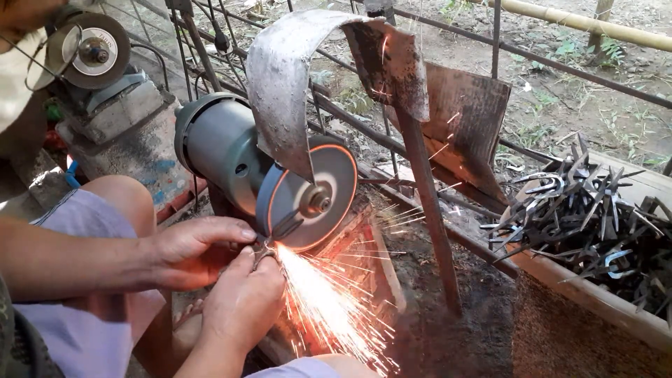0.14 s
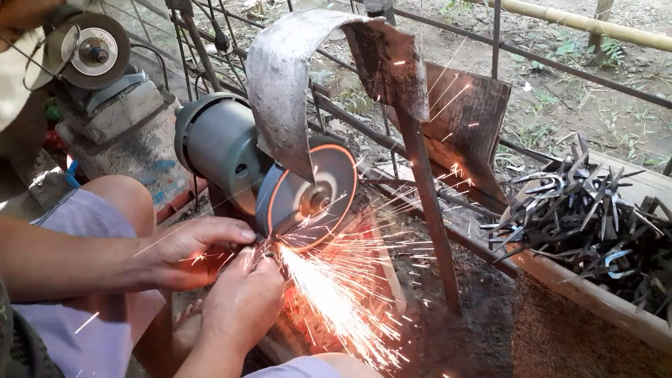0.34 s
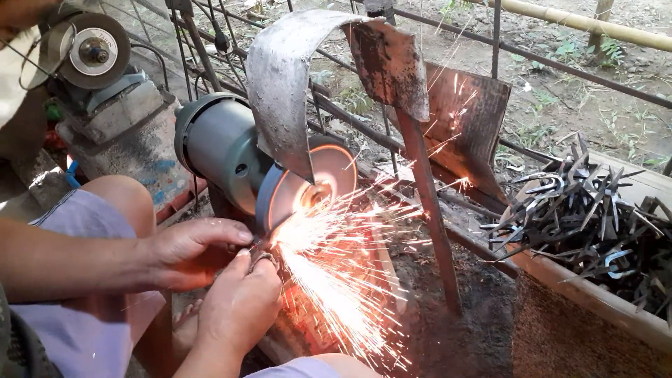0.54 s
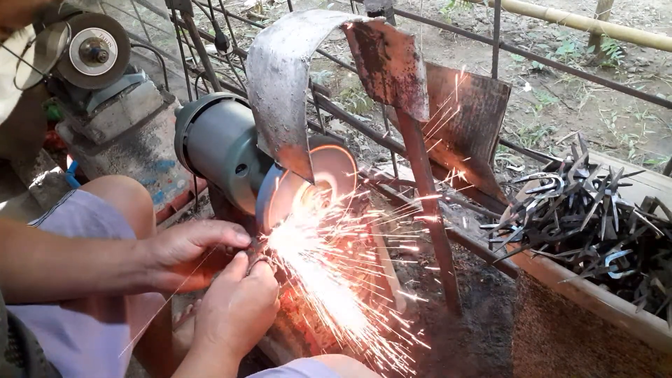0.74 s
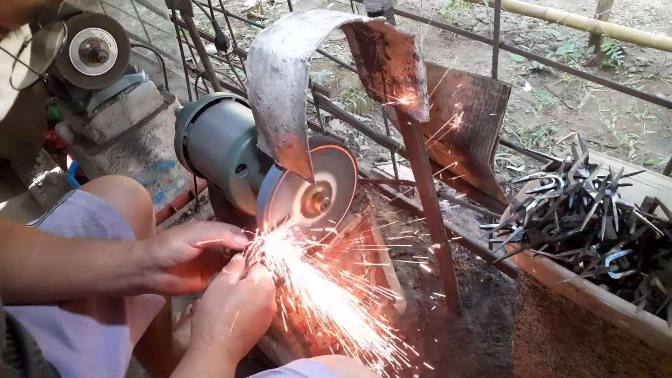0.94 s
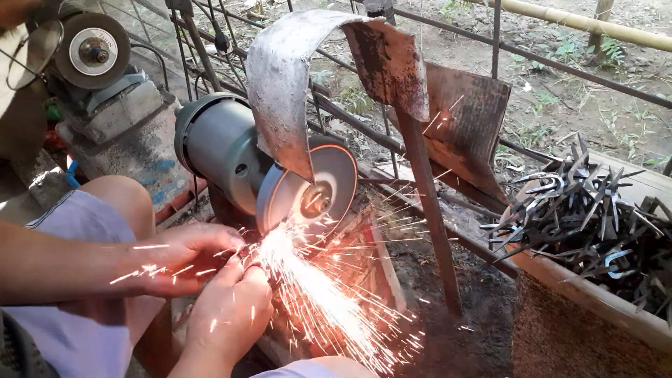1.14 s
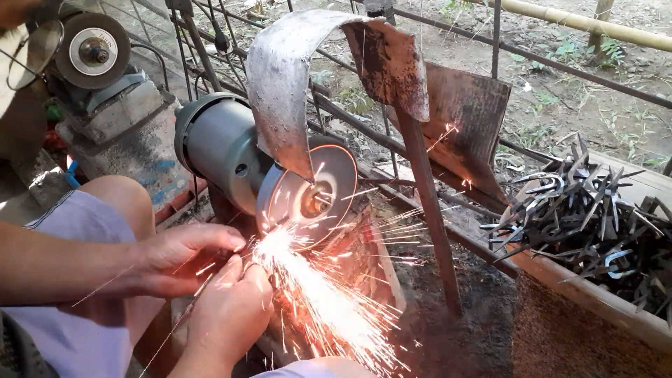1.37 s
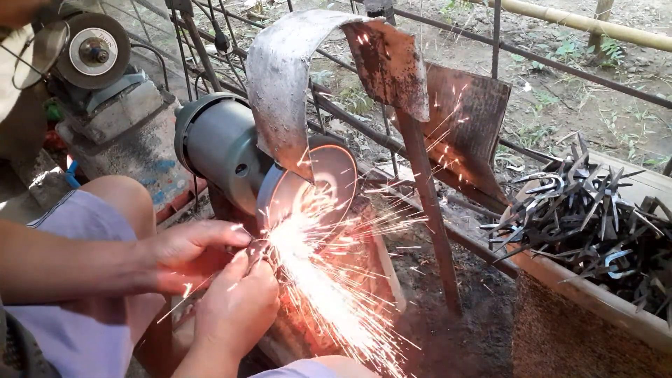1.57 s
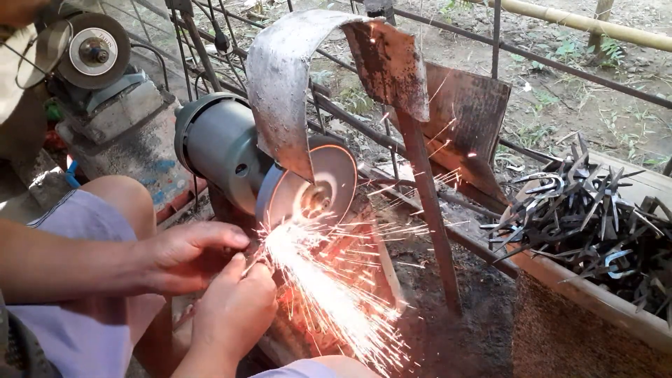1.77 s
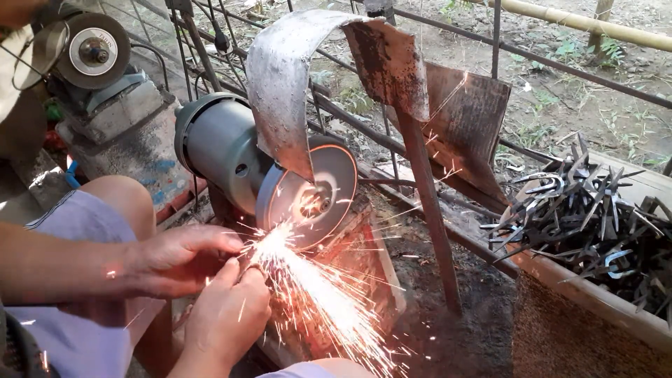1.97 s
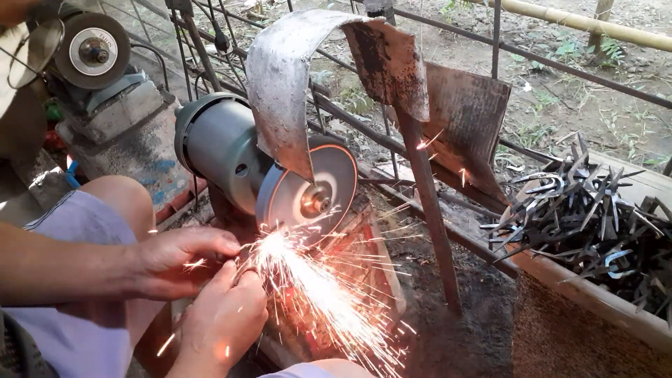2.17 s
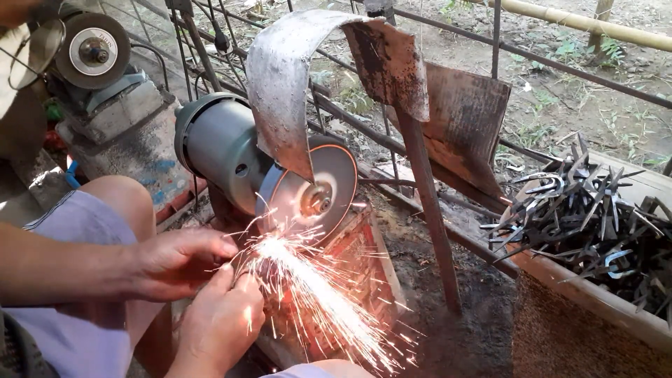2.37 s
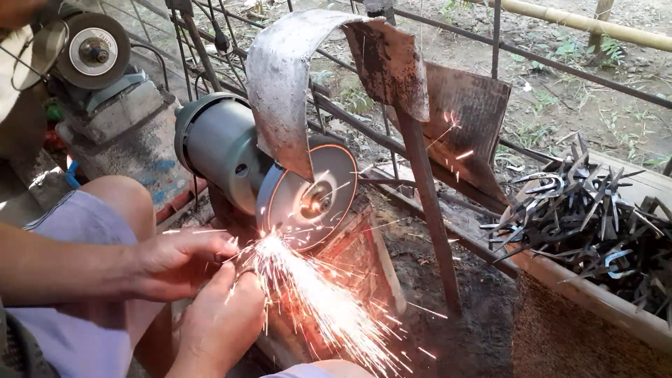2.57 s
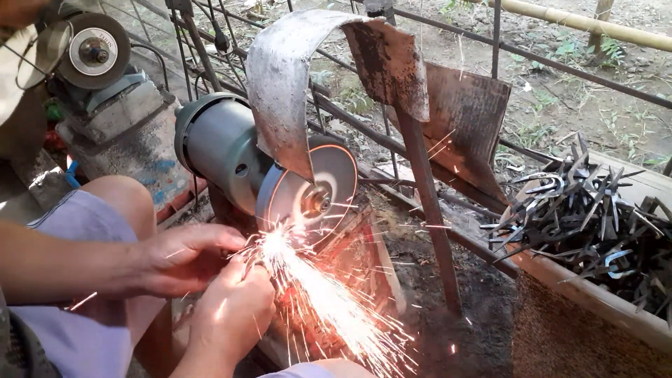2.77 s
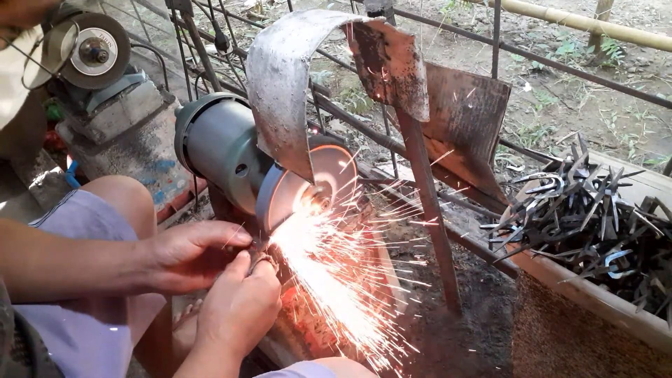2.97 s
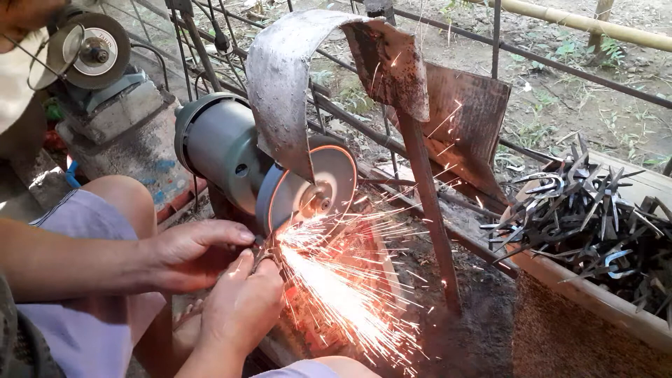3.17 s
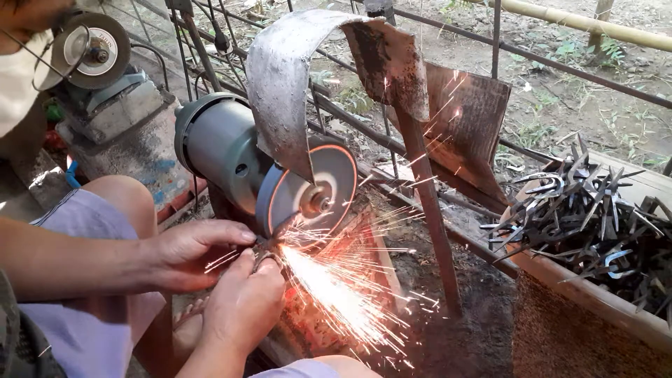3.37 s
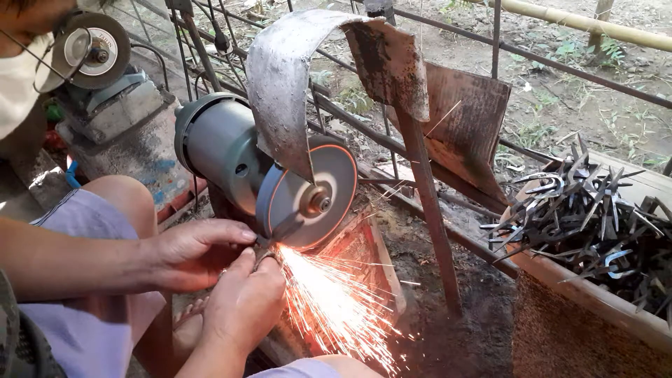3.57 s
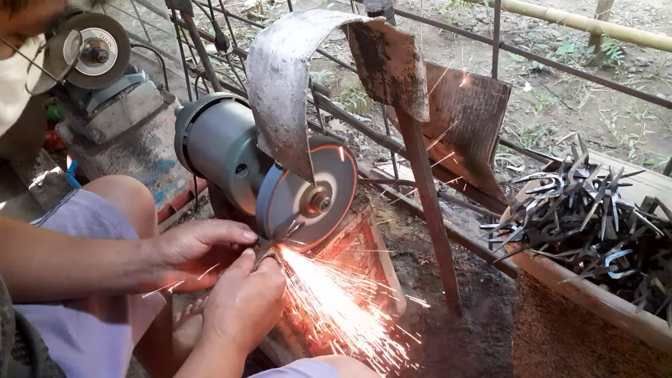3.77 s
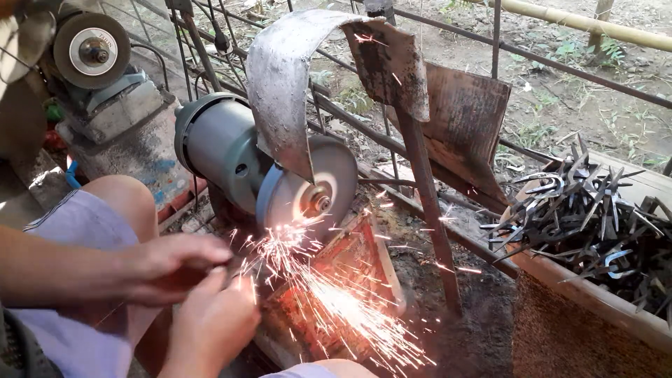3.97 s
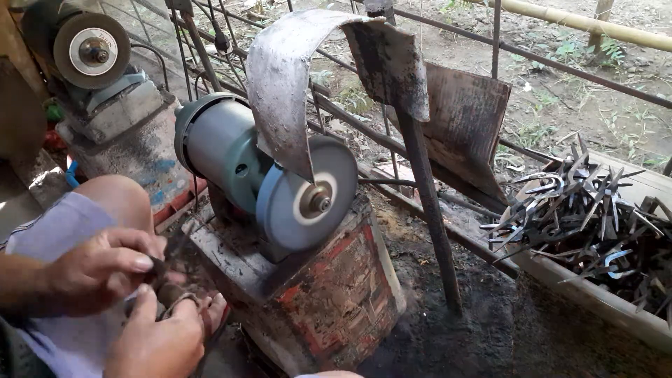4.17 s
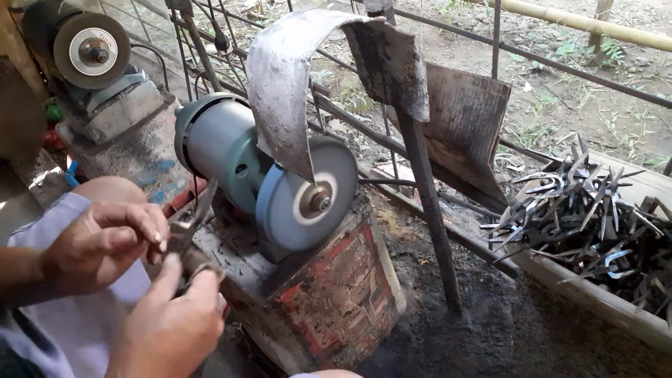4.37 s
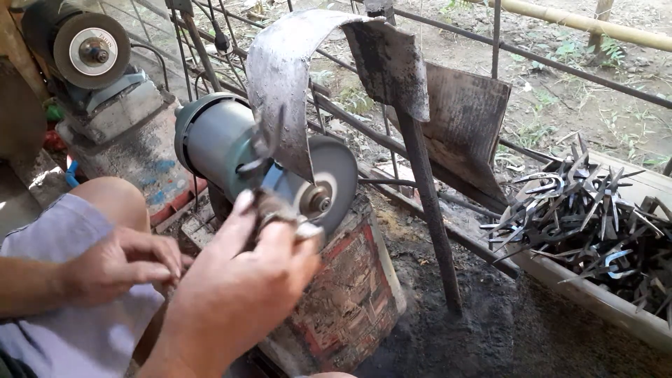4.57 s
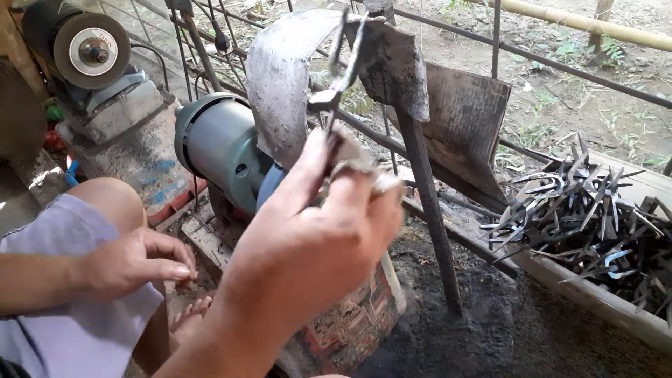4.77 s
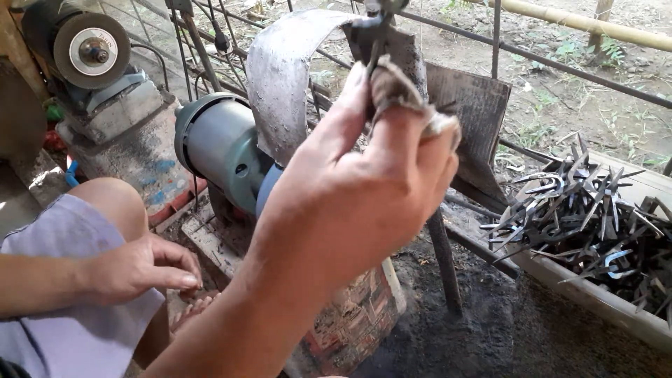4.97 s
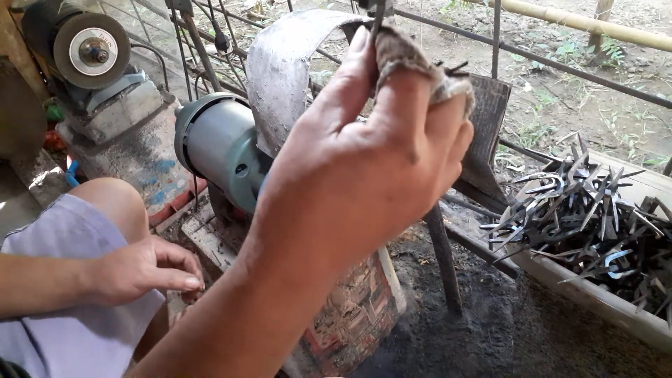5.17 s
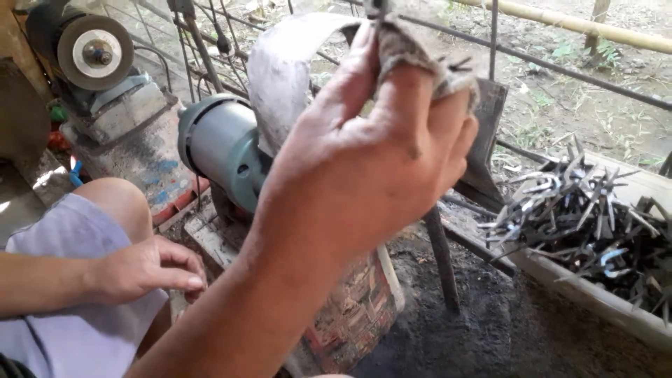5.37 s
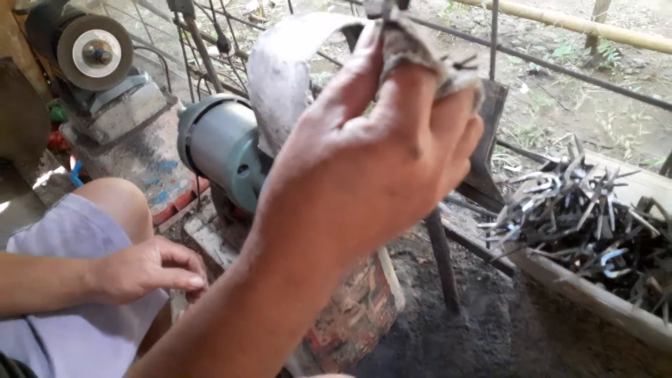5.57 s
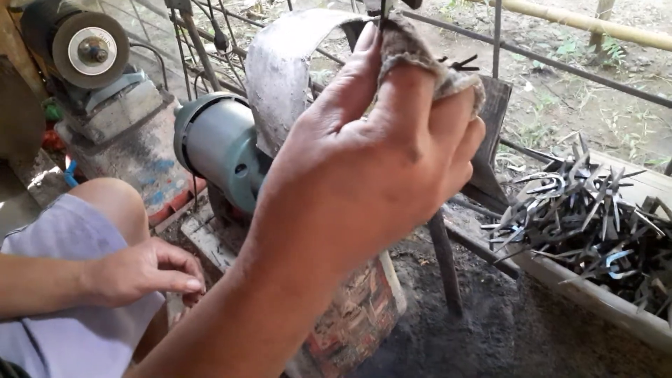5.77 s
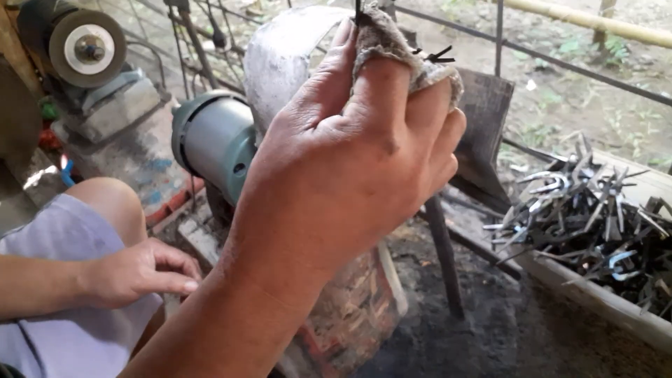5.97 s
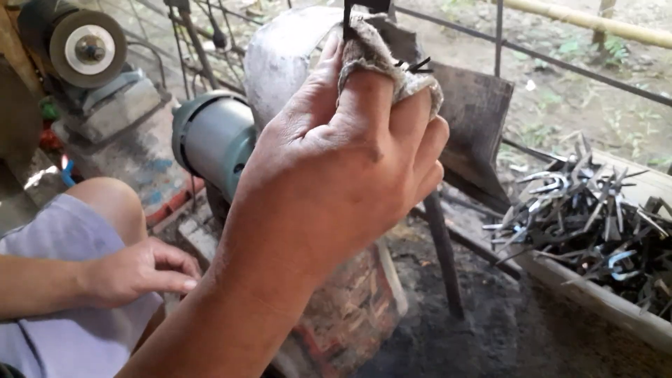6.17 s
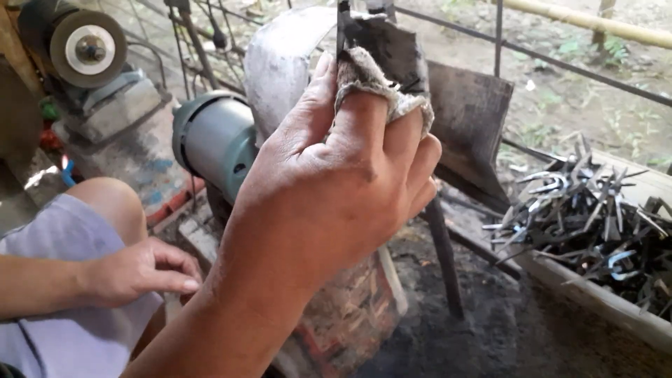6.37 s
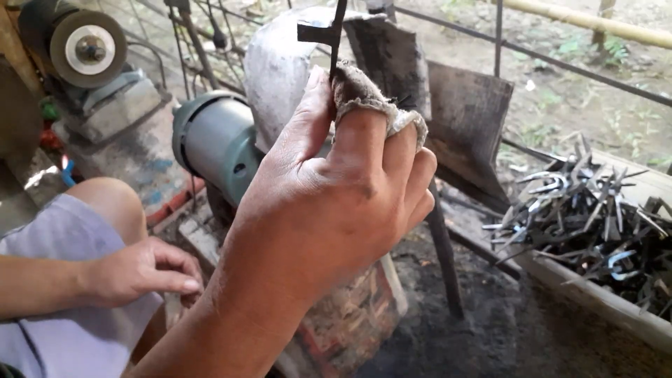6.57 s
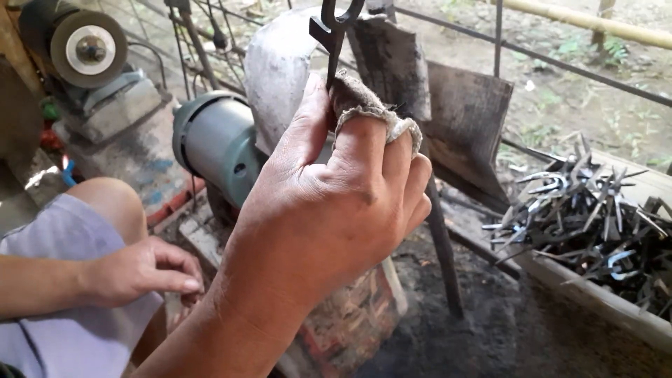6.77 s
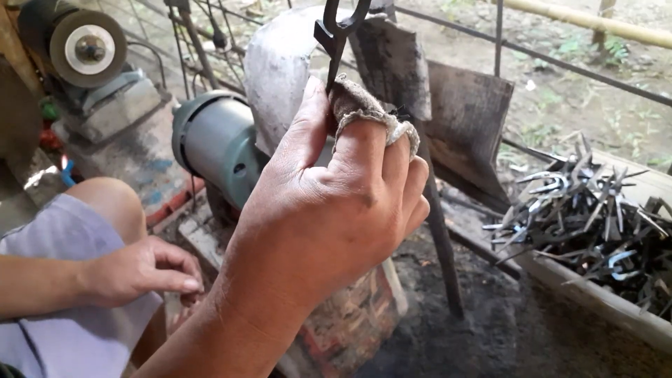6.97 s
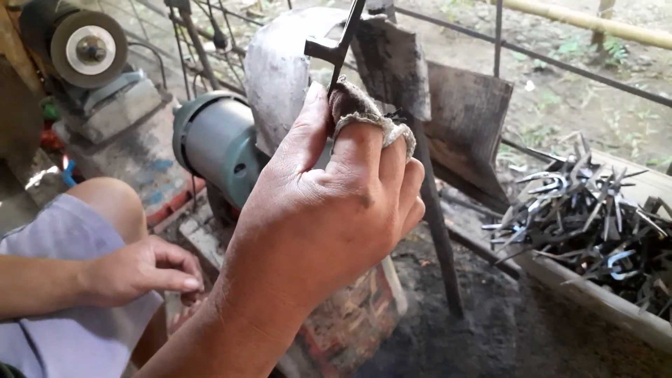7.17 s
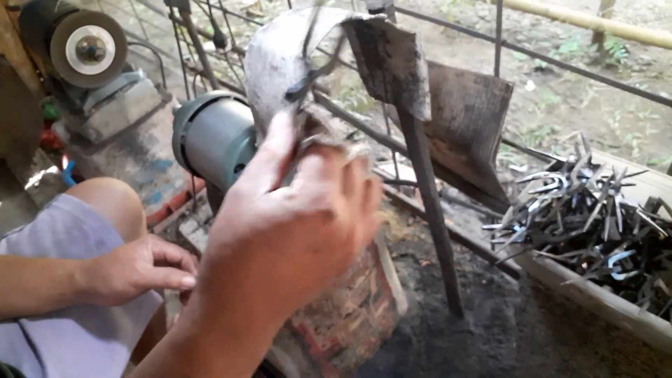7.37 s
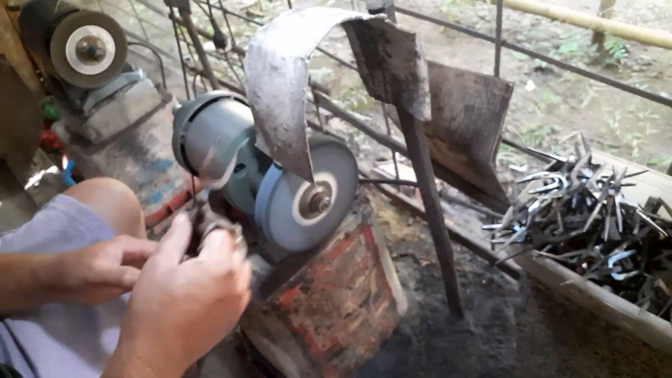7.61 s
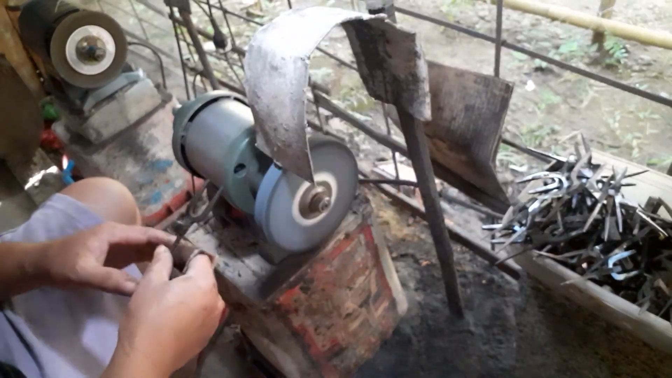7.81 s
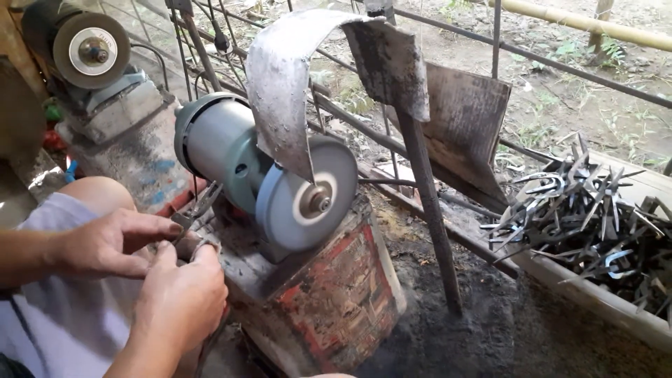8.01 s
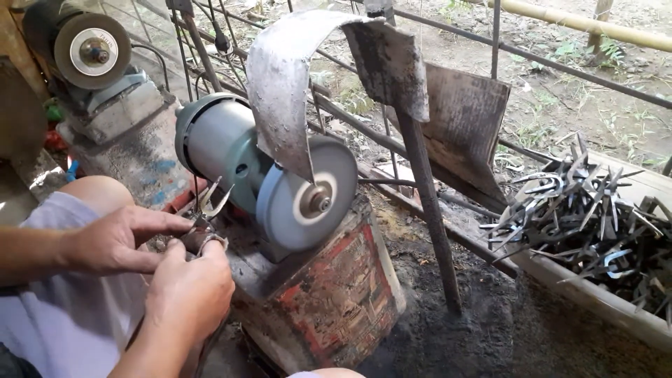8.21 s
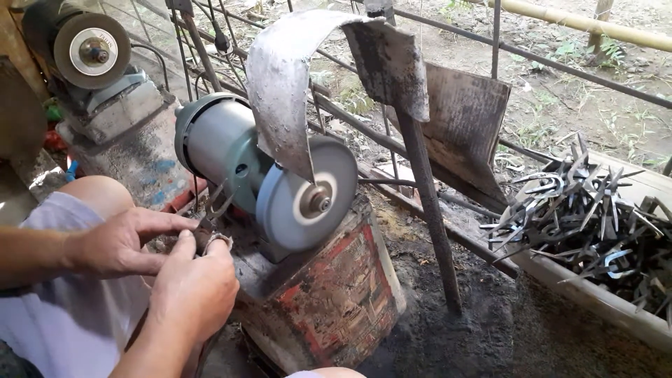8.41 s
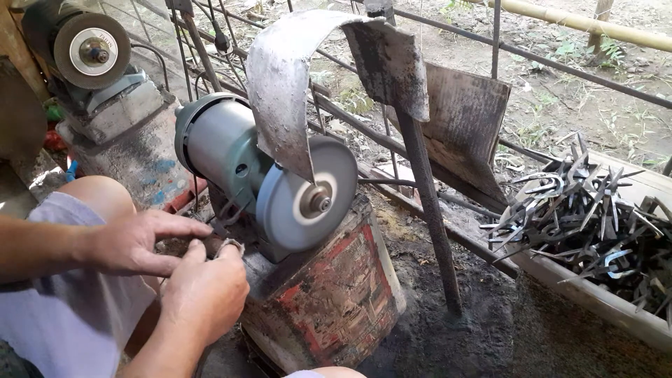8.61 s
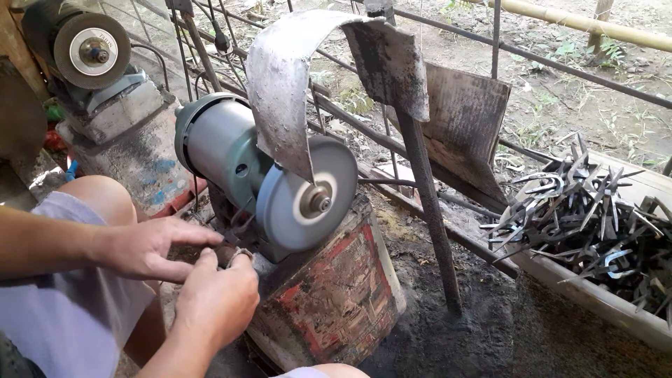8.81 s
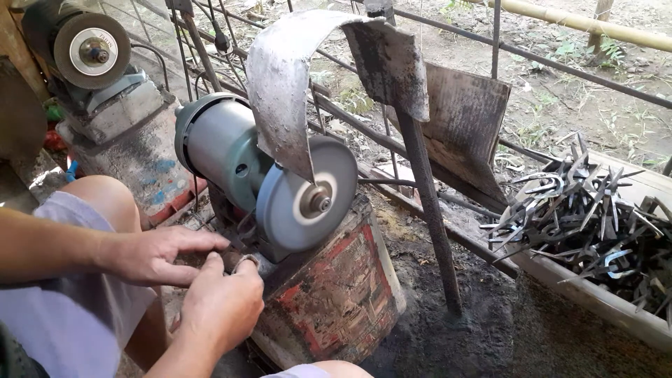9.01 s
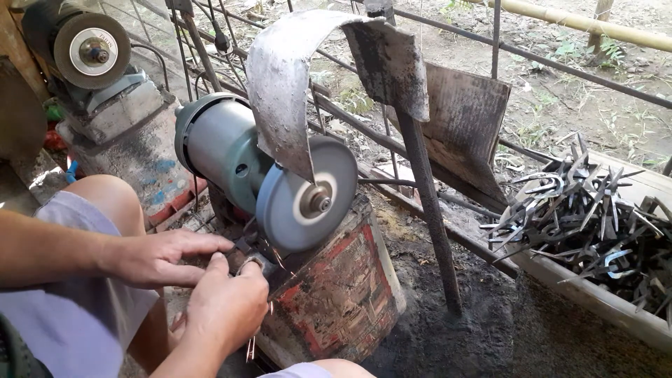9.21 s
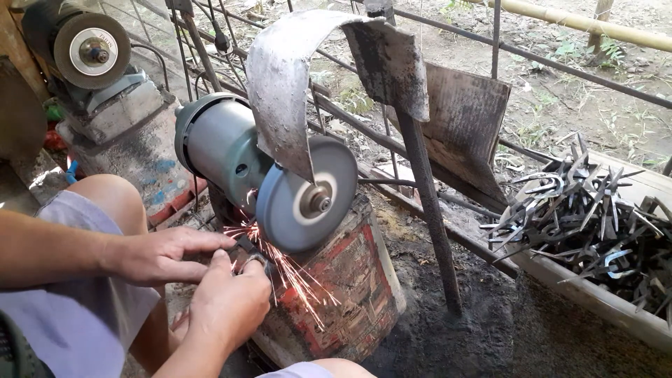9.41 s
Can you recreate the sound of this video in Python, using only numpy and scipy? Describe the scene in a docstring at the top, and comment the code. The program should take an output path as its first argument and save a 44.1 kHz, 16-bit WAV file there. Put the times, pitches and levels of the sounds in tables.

```python
"""A small steel blank is pressed against the wheel of a bench grinder in an open-sided workshop.
Grit that passes once a turn and wears as it goes scrapes the steel, and rings blank, wheel and tool rest.
At four seconds the blank is lifted off; a rag brushes it, and near nine seconds it is eased back more lightly.
Throughout, the motor hums, ticks and whines as harmonics and noise tied to its shaft; an engine drones far off.
The recorder's gain control ducks under the screech and recovers late after the lift."""
import sys
import numpy as np
from scipy import signal
from scipy.fft import rfft, irfft
from scipy.io import wavfile
from scipy.ndimage import uniform_filter1d, minimum_filter1d, map_coordinates

SR = 44100
rng = np.random.default_rng(int(sys.argv[2]) if len(sys.argv) > 2 else 0)


def to_wav(s):
    """Save 16-bit WAV."""
    ch = np.atleast_2d(s).T  # columns
    pcm = np.round(np.clip(ch, -1, 1) * 32767)  # PCM
    wavfile.write(sys.argv[1], SR, pcm.astype(np.int16))


N = 416743
FFT_SIZE = 432000
TIME, FREQ = np.arange(N) / SR, np.arange(FFT_SIZE // 2 + 1) * SR / FFT_SIZE  # s, Hz

# Shaft speed, sagging as the blank is pushed in. Each row: time in seconds, turns per second in Hz.
SHAFT_SPEED = [(0, 58.3), (.35, 57.88), (.75, 58.08), (1.3, 58.72), (1.7, 58.3), (2.1, 58.76),
               (2.55, 59.02), (2.95, 58.44), (3.35, 57.94), (3.95, 58.4), (4.08, 60.1), (7.3, 60.16),
               (9.2, 60.08), (9.45, 59.5)]
# Bending resonances of the blank. Each row: frequency in Hz, width in Hz, relative level in dB.
BENDING_MODES = [(4162, 26, 14.5), (3780, 35, -7), (4046, 58, -7), (4437, 31, 8), (4670, 98, -7.5)]
# Higher resonances of the blank. Each row: frequency in Hz, width in Hz, relative level in dB.
HIGH_MODES = [(9345, 30, 3), (9675, 35, 6.5), (15283, 26, 1.5), (15728, 22, -1)]
# Colour of the grit's scrape. Each row: frequency in Hz, relative level in dB.
GRIT_COLOUR = [(300, -15.5), (700, -16), (950, -4), (1250, -2.5), (2400, 3.5), (3500, -2.5), (5000, 2.5),
               (6600, -6), (7700, -6.5), (9500, 2.5), (11000, -41), (16000, -1.5)]
# Strength of the wheel's ring. Each row: time in seconds, level in dB.
WHEEL_RING = [(0.03, -29.5), (1.15, -33), (1.45, -27.5), (1.95, -32), (2.35, -45.5), (2.8, -31),
              (3.81, -31), (3.98, -28), (4.0, -39)]

LIFT_S, RELEASE_S = 4.022, 0.026  # the blank leaves the wheel, and how long that takes
RETURN_S, ATTACK_S, RETURN_DB = 9.16, 0.095, -3  # it is eased back, and the second touch is lighter
DUCK_DB = 5  # deepest cut of the gain control; the work is this much louder ahead of it


def undb(db):
    """Logarithmic level: decibels to amplitude gain."""
    return 10 ** (np.asarray(db) / 20)


def curves(rows):
    """Linear interpolation: each column of a (s, ..) table at every sample."""
    s, *columns = np.transpose(rows)
    return [np.interp(TIME, s, column) for column in columns]


def colour(points):
    """Spectral envelope: gain at every frequency from (Hz, dB) points on a logarithmic axis."""
    hz, db = np.transpose(points)
    return undb(np.interp(np.log(FREQ + 1), np.log(hz), db))


def modes(rows):
    """Modal superposition: a sum of damped resonances whose neighbours alternate in sign."""
    response = 0
    for k, (hz, width, db) in enumerate(rows):
        damping = 1j * FREQ * width
        response = response + (-1) ** k * undb(db) * damping / (hz ** 2 - FREQ ** 2 + damping)
    return response


def causal(gain):
    """Minimum phase: the response with this gain that rings only after a blow, by way of the cepstrum."""
    cepstrum = irfft(np.log(gain))
    return np.exp(2 * rfft(cepstrum[:len(FREQ)], len(cepstrum)) - cepstrum[0])


def unit(response):
    """Power normalisation: scale a response so that white noise keeps its level."""
    return response / np.sqrt(np.mean(abs(response) ** 2))


def through(x, response):
    """Linear filtering: multiply the spectrum of a signal by a response."""
    return irfft(rfft(x, FFT_SIZE) * response)[..., :N]


def noise():
    """White noise: equal mean power at all frequencies."""
    return rng.standard_normal(N)


def walk(rate):
    """Band-limited chance: smooth random values with a spread near 1, drawn rate times a second."""
    knots = rng.standard_normal(2 ** 11)
    return np.interp(TIME * rate, np.arange(2 ** 14) / 2 ** 3, signal.resample(knots, 2 ** 14))


def swell(s, spread_s, db):
    """Gaussian envelope: a bell-shaped rise and fall about time s."""
    return undb(db) * np.exp(-.5 * ((TIME - s) / spread_s) ** 2)


def swells(rows):
    """Superposed envelopes: a swell for each (s, spread s, dB) row."""
    return sum(swell(*row) for row in rows)


def tone(hz, waver_hz, rate):
    """Frequency modulation: a sine whose pitch wavers at random; rms 1."""
    return np.sqrt(2) * np.sin(2 * np.pi * np.cumsum(hz + waver_hz * walk(rate)) / SR)


def harmonics(cycles, orders, waver_db, rate):
    """Order locking: sines at (multiple, dB) of one rotation, each wavering in level."""
    total = 0
    for multiple, db in orders:
        level = undb(db + waver_db * walk(rate))
        total = total + np.sqrt(2) * level * np.sin(2 * np.pi * (multiple * cycles + rng.random()))
    return total


def rim(turns, keep, count):
    """Wear: a random profile of count points a turn; each turn keeps a share of the one before."""
    keep = np.clip(keep, 0, .999)
    fresh = rng.standard_normal((600, count))
    renewal = np.sqrt(1 - keep ** 2)  # holds the spread at 1
    worn = signal.lfilter([renewal], [1, -keep], fresh[1:], axis=0, zi=keep * fresh[:1])[0]
    return map_coordinates(worn.ravel(), [turns * count], order=2, mode="nearest")


def track(turns, keep, width):
    """Partial coherence: one rotating profile in both channels, a second with opposite signs."""
    shared = rim(turns, keep, count=768)
    opposed = width * rim(turns, keep, count=768) * np.array([[1], [-1]])
    return (shared + opposed) / np.hypot(1, width)


def sustain(ring, level, hold, decay_s):
    """Friction feedback: damps a ring that grows, feeds one that fades; it lags level and dies away freely."""
    power = np.abs(uniform_filter1d(np.mean(ring ** 2, axis=0), SR // 25)) + 1e-9
    pole = np.exp(-1 / (decay_s * SR))
    lagging_level = signal.lfilter([1 - pole], [1, -pole], level)
    return ring / power ** (np.clip(hold, 0, 1) / 2) * lagging_level


def ports(x, pan, spread, room_db, t60):
    """Spaced reception: two ports out of step in the treble, with a short scatter from roof and benches."""
    t = TIME[:SR // 3]
    tails = rng.standard_normal((2, len(t))) * undb(-60 * t / t60) * (t > .003)
    tails /= np.sqrt(np.sum(tails ** 2, axis=1, keepdims=True))
    apart = FREQ / (FREQ + 300)
    left = np.sqrt(colour(pan)) * np.exp(1j * spread * apart)
    direct = left ** np.array([[1], [-1]])  # right is the reciprocal of left
    return through(x, direct + undb(room_db) * apart ** 2 * rfft(tails, FFT_SIZE))


def touch_of_steel():
    """Unilateral contact: full until the blank is lifted, then eased back in more lightly."""
    lifted = np.clip((LIFT_S - TIME) / RELEASE_S, 0, 1)
    back = np.clip((TIME - RETURN_S) / ATTACK_S, 0, 1)
    return lifted + undb(RETURN_DB) * back ** 2


def about_mean(curve):
    """Deviation from the average over the first touch."""
    return curve - np.mean(curve[TIME < LIFT_S])


def bite_and_sag():
    """Load on the shaft: bite in dB and slowing in Hz, each about its average; a harder push slows it."""
    # Depth of the edge's bite. Each row: time in seconds, level of the cut's sizzle in dB.
    bite_depth = [(0.0, -31), (0.22, -31.5), (0.42, -41.5), (0.73, -29.5), (1.56, -31.5), (1.71, -39),
                  (1.78, -29), (2.38, -34.5), (2.45, -38.5), (2.76, -30), (3.24, -40.5), (3.51, -29),
                  (3.82, -31), (3.91, -40.5), (3.94, -29.5), (4.0, -35)]
    bite = about_mean(curves(bite_depth)[0])
    sag = about_mean(-curves(SHAFT_SPEED)[0])
    return bite, np.maximum(sag, -0.38)  # Hz; the lightest push that still cuts


def wheel_relief(turns):
    """Surface roughness under the blank: the wheel's high spots press coarse bumps and fine grains harder."""
    high_spots = undb(1.1 * rim(turns, keep=0.95, count=14))
    pressure = high_spots * undb(2.5 * rim(turns, keep=0.77, count=120))
    bumps = pressure * track(turns, keep=0.74, width=0.56)  # coarse relief lasts many turns
    grains = pressure * track(turns, keep=0.44, width=0.53)  # fine edges break away quickly
    return bumps, grains


def abrasion(bumps, grains, contact, shudder, bite, sag):
    """Roughness noise: bumps growl with the push and scrape; grains hiss, and sizzle with the bite."""
    # Resonances under the grit. Each row: frequency in Hz, width in Hz, relative level in dB.
    grit_modes = [(2205, 9.2, -4), (2635, 71, -3), (3225, 136, -6.5), (5050, 60, -24), (6032, 130, 0),
                  (8770, 200, -5.5), (10080, 58, -4), (12130, 28, -8)]
    # Colour of the sizzle. Each row: frequency in Hz, relative level in dB.
    spark_colour = [(7000, -25), (9800, -21.5), (10500, 0), (11300, -1.5), (12100, 4), (12700, -11),
                    (13500, -15), (16000, -5)]
    ringing = about_mean(curves(WHEEL_RING)[0])
    coarse, deep = 1 / (1 + (FREQ / 3200) ** 4), 1 / (1 + (FREQ / 1250) ** 8)
    resonant_power = undb(11.5) ** 2 * abs(modes(grit_modes)) ** 2
    body = unit(np.sqrt(colour(GRIT_COLOUR) ** 2 + resonant_power))
    # levels: dB at an average bite and push, then dB per dB of bite or ring, and dB per Hz of sag
    growl_level = undb(-29.5 + 13.7 * sag)
    scrape_level = undb(-32 + 0.8 * ringing)
    hiss_level = undb(-30.5 + 0.1 * bite + 1 * sag) + shudder
    sizzle_level = undb(-31 + 1.52 * bite + 0.69 * walk(28.32))
    growl = through(bumps * contact * growl_level, body * np.sqrt(deep))
    scrape = through(bumps * contact * scrape_level, body * np.sqrt(coarse * (1 - deep)))
    hiss = through(grains * contact * hiss_level, body * np.sqrt(1 - coarse))
    sizzle = through(grains * contact * sizzle_level, unit(colour(spark_colour)))
    return growl + scrape + hiss + sizzle


def blank_ring(grains, contact, shudder, bite, sag):
    """Forced modes: grains ring the blank, a push damps it; shudders damp bending and stir high modes."""
    chatter = undb(0.75 * walk(130))  # the hand-held blank bounces lightly
    limited_bite = np.minimum(bite + 0.5, 0)  # beyond -0.5 dB of bite the bending rings no louder
    bend_level = undb(-23 + 1.1 * limited_bite - 5 * sag + 0.5 * walk(110))
    bend_level = bend_level / (1 + (shudder / undb(-40)) ** 2)  # a -40 dB shudder halves it
    high_level = undb(-28.5 + 0.16 * bite - 2.3 * sag + 0.43 * walk(14)) + undb(7) * shudder
    bend = through(grains * chatter, unit(modes(BENDING_MODES)))
    high = through(grains, unit(modes(HIGH_MODES)))
    return (sustain(bend, contact * bend_level, hold=0.77, decay_s=0.0026)
            + sustain(high, contact * high_level, hold=0.37, decay_s=0.0017))


def wheel_ring(bumps, contact):
    """Forced modes: the coarse bumps drive the wheel's own resonances."""
    # Resonances of the wheel. Each row: frequency in Hz, width in Hz, relative level in dB.
    wheel_modes = [(1440, 108, -2.5), (1539, 62, 7.5), (1675, 140, -9.5), (1794, 38, -0.5)]
    level = undb(curves(WHEEL_RING)[0] + 1.65)
    return sustain(through(bumps, unit(modes(wheel_modes))), contact * level, hold=0.32, decay_s=0.0012)


def rest_rumble(contact, shudder):
    """Structure-borne noise: the pressed blank stirs the tool rest, more so in a shudder."""
    # Resonances of the tool rest. Each row: frequency in Hz, width in Hz, relative level in dB.
    rest_modes = [(112, 24, -5), (331.6, 46, 11)]
    return through(noise() * contact * (undb(-52.5) + shudder), unit(modes(rest_modes)))


def squealing():
    """Self-excited friction: the blank squeals briefly on one of its modes."""
    # Each row: time in seconds, spread in seconds, pitch in Hz, level in dB.
    squeals = [(0.13, .025, 9690, -22.5), (3.966, 0.016, 4200, -17.5)]
    return sum(swell(s, spread, db) * tone(hz, waver_hz=27.0, rate=150) for s, spread, hz, db in squeals)


def singing(contact):
    """Self-excited friction: the wheel sings at one pitch when it is pressed just so."""
    # Each row: time in seconds, spread in seconds, level in dB.
    songs = [(.62, 0.11, -39), (.9, .07, -28), (1.68, .17, -39.5), (3.45, 0.098, -36.5), (9.32, 0.03, -36)]
    return contact * swells(songs) * undb(0.93 * walk(35)) * tone(2505, waver_hz=5.06, rate=30)


def grinding(turns):
    """Common excitation: one worn relief scrapes the steel and drives the blank and the wheel."""
    # Shudders of the blank on the tool rest. Each row: time in seconds, spread in seconds, level in dB.
    shudders = [(.09, 0.05, -41), (1.5, 0.042, -51), (1.82, 0.022, -52), (2.24, 0.064, -44.5),
                (2.46, 0.073, -39.5), (3.08, 0.019, -51), (3.56, 0.062, -42), (3.76, 0.034, -39),
                (4.0, 0.025, -40), (9.265, .015, -42)]
    contact, shudder = touch_of_steel(), swells(shudders)
    bite, sag = bite_and_sag()
    bumps, grains = wheel_relief(turns)
    rubbing = abrasion(bumps, grains, contact, shudder, bite, sag)
    rings = blank_ring(grains, contact, shudder, bite, sag) + wheel_ring(bumps, contact)
    return rubbing + rings + rest_rumble(contact, shudder) + squealing() + singing(contact)


def loose_part(turns):
    """Impact excitation: a loose part ticks once a turn, rings the housing and buzzes in swells."""
    # Swells of the buzz. Each row: time in seconds, housing ring in dB, once-a-turn tick in dB.
    buzzes = [(4.65, -64, -49), (5.46, -47.5, -50), (6.19, -48.5, -50.5), (7.02, -53, -48.5),
              (7.85, -61, -48), (8.6, -47, -45), (9.27, -46.5, -47)]
    # Colour of the ticks. Each row: frequency in Hz, relative level in dB.
    rattle_colour = [(100, -21), (300, 3.5), (550, 7.5), (800, -4.5), (1000, 5.5), (1200, 6.5), (1350, -24),
                     (1700, -3.5), (2000, -30), (3200, -5.5), (6000, -30.5)]
    # Resonances of the housing. Each row: frequency in Hz, width in Hz, relative level in dB.
    housing_modes = [(1516.3, 30, 5), (1720, 98, -8.5)]
    buzz_s = 0.18  # spread of a swell
    ring_level = undb(-68) + swells((s, buzz_s, db) for s, db, _ in buzzes)
    tick_level = undb(-65) + swells((s, buzz_s, db) for s, _, db in buzzes)
    touch = np.exp(-(turns % 1) / 0.36) + 0.094  # strongest at the start of each turn
    rattle = rim(turns, keep=0.96, count=768) * touch / np.sqrt(np.mean(touch ** 2))
    ticks = through(rattle * tick_level, unit(colour(rattle_colour)))
    once_a_turn = np.diff(np.floor(turns), prepend=0) * np.sqrt(N / turns[-1])  # rms 1
    pulse = once_a_turn * undb(.9 * walk(50))
    return ticks + through(pulse * ring_level, unit(modes(housing_modes)))


def bearings(turns):
    """Rolling noise: a worn track drives resonances that throb with rotation, beside steady whistles."""
    # Resonances of bearings and housing. Each row: frequency in Hz, width in Hz, relative level in dB.
    bearing_modes = [(4200, 65, -9), (5020, 150, -10), (5440, 90, -8.5), (6000, 120, -4.5), (7400, 87, -9),
                     (8610, 150, -4), (9200, 110, -3.5), (11920, 130, 0), (13370, 450, -3.5),
                     (15230, 180, -7), (15500, 330, -3.5)]
    # Whistling tones. Each row: pitch in Hz, level in dB.
    whistles = [(8543, -50.5), (8592, -50.5), (8662, -53), (8764, -57.5), (9135, -70), (10621, -56.5),
                (11919, -57)]
    throb = undb(1.5 * rim(turns, keep=0.97, count=8))
    rolling = track(turns, keep=0.56, width=0.5) * undb(-44.5) * throb
    whine = through(rolling, unit(modes(bearing_modes)))
    return whine + sum(undb(db) * tone(hz, waver_hz=5.62, rate=70) for hz, db in whistles)


def fan_air(turns):
    """Flow noise: a broad rush that partly repeats with each turn."""
    # Colour of the rush. Each row: frequency in Hz, relative level in dB.
    air_colour = [(25, -24), (70, -3.5), (110, 2), (185, -12.5), (360, -9), (480, -13), (750, -16),
                  (1500, -16), (2500, -23.5), (4700, -21.5), (7900, -21.5), (8900, -15), (9900, -16.5),
                  (12200, -18.5), (16000, -23.5)]
    rush = track(turns, keep=0.27, width=0.27) * undb(-44.0 + 0.33 * walk(6.3))
    return through(rush, unit(colour(air_colour)))


def motor(turns):
    """Rotating machinery: shaft harmonics, a loose part, whining bearings and fan air."""
    # Harmonics of the hum. Each row: multiple of the shaft speed, level in dB.
    hum_orders = [(1, -43), (2, -57.5), (3, -59.5), (4, -58.5), (5, -56.5), (6, -49.5), (8, -51.5),
                  (9, -59.5), (10, -70), (16, -59), (20, -79)]
    hum = harmonics(turns, hum_orders, waver_db=0.05, rate=4.7)
    return hum + loose_part(turns) + bearings(turns) + fan_air(turns)


def far_engine():
    """Periodic firing: a distant drone of harmonics, each fading in and out on the way."""
    # Drifting pitch. Each row: time in seconds, firing rate in Hz.
    firing_rate = [(0, 109.7), (4.3, 106.4), (4.7, 97.7), (5.3, 102), (5.9, 115), (7.2, 111), (7.8, 110.1),
                   (8.45, 119), (9.45, 113.5)]
    # Harmonics. Each row: multiple of the firing rate, relative level in dB.
    firing_orders = [(1, -3), (2, -14), (3, -18), (4, -30), (5, -11), (6, -13.5), (7, -17.5), (8, -15)]
    cycles = np.cumsum(curves(firing_rate)[0] + 2.09 * walk(30)) / SR
    return undb(-46.5) * harmonics(cycles, firing_orders, waver_db=2.5, rate=14)


def blows():
    """Impact on rest and wheel: a longer contact gives a duller knock, and the caught blank rings."""
    # Each row: time in seconds, contact spread in seconds, relative dull knock in dB, steel ring in dB.
    hits = [(2.638, 0.00031, -11, -22), (3.996, .0002, -14, -14), (4.012, .0001, -24, -23),
            (4.018, 0.00004, -7, -11.5), (7.58, .00005, -31, -47), (9.269, 0.00014, -23, -11)]
    # Colour of the knock. Each row: frequency in Hz, relative level in dB.
    knock_colour = [(40, -11), (110, 4), (240, -3), (450, -13.5), (1100, 4), (2200, -12), (3300, -11),
                    (6000, -51), (15000, -34)]
    s, _, _, ring_db = np.transpose(hits)
    # each push has the same area whatever its length
    knocks = sum(swell(at, spread, db) / swell(at, spread, 0).sum() for at, spread, db, _ in hits)
    rings = np.bincount((s * SR).astype(int), undb(ring_db), N)
    crunch = unit(rfft(noise() * np.exp(-TIME / 0.0022), FFT_SIZE))
    rough = FREQ / (FREQ + 700)  # the bass of a knock stays one clean push
    ringing_steel = unit(modes(BENDING_MODES)) + unit(modes(HIGH_MODES))
    steel = ringing_steel + 0.45 * crunch * unit(colour(GRIT_COLOUR))
    thud = unit(causal(colour(knock_colour))) * (1 - rough + rough * crunch)
    return through(knocks, 3.1 * thud) + through(rings, 3.4 * steel)


def rag_wipe():
    """Friction noise: a rag brushes once over the lifted steel."""
    # One row: time in seconds, spread in seconds, level in dB.
    stroke = (4.84, 0.06, -38.5)
    # Colour of the brushing. Each row: frequency in Hz, relative level in dB.
    rag_colour = [(100, -25), (300, 5.5), (700, -15), (2000, -17), (5500, -13), (9000, -22), (15000, -30)]
    return through(noise() * swell(*stroke), unit(colour(rag_colour)))


def scene():
    """Shared rotation: one shaft drives the grinding and the motor, heard from two directions."""
    # Balance of the work. Each row: frequency in Hz, left minus right in dB.
    grind_pan = [(60, -4), (110, 24.5), (200, 13), (380, 12), (700, 8.5), (1290, 0.0), (2380, 4), (4400, 1),
                 (8120, 3), (15000, -4.5)]
    # Balance of all else. Each row: frequency in Hz, left minus right in dB.
    motor_pan = [(60, 4), (110, 4.5), (200, 2.5), (380, 7), (700, 2), (1290, -2), (2380, 5), (4400, 6),
                 (8120, 7), (15000, -5)]
    turns = np.cumsum(curves(SHAFT_SPEED)[0]) / SR
    work = undb(DUCK_DB) * (grinding(turns) + blows())
    idle = motor(turns) + far_engine() + rag_wipe()
    work_heard = ports(work, grind_pan, spread=0.5, room_db=-6, t60=0.21)
    return work_heard + ports(idle, motor_pan, spread=0.73, room_db=-4, t60=0.024)


def record(dry):
    """Dynamic compression: gain ducks at once under loud sound, holds, then creeps back; the top is cut."""
    hold_s, release_s, threshold_db = 1.05, .8, -29
    power = np.abs(uniform_filter1d(np.mean(dry ** 2, axis=0), SR // 50))
    level_db = 10 * np.log10(power + 1e-12)
    wanted_db = -np.clip(level_db - threshold_db, 0, DUCK_DB)
    half = int(hold_s * SR / 2)
    # origin=half makes the minimum look back only
    held_db = minimum_filter1d(wanted_db, 2 * half + 1, origin=half, mode="nearest")
    ramp_db = TIME * DUCK_DB / release_s  # fastest allowed recovery
    gain_db = np.minimum.accumulate(held_db - ramp_db) + ramp_db
    low_pass = signal.ellip(12, .2, 80, 15780, fs=SR, output="sos")  # edge at 15780 Hz
    return signal.sosfilt(low_pass, dry * undb(gain_db))


dry = scene()
out = record(dry)
to_wav(out)
```